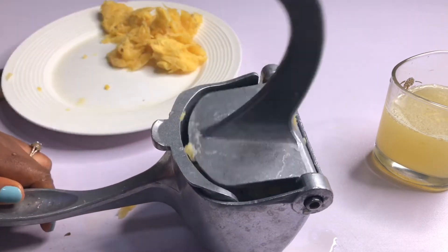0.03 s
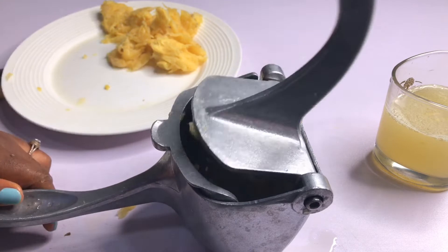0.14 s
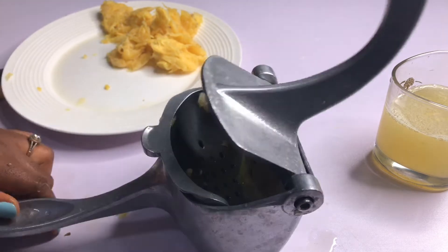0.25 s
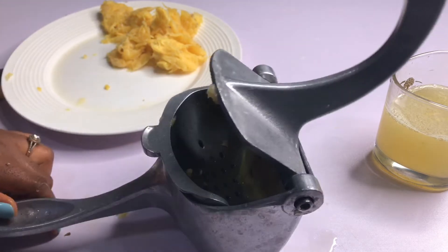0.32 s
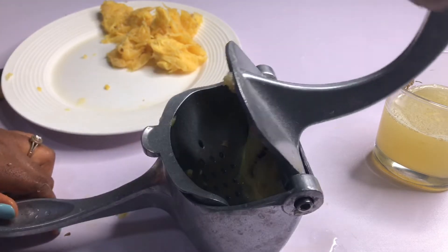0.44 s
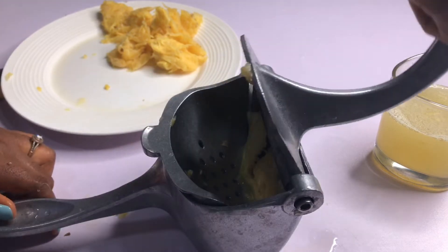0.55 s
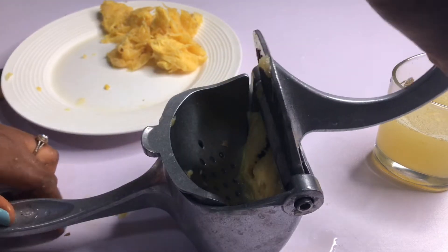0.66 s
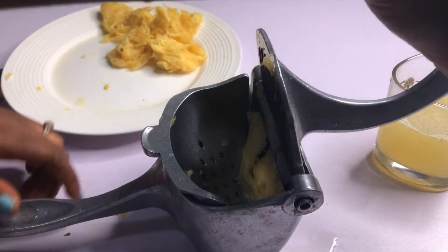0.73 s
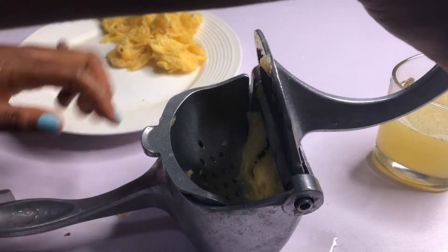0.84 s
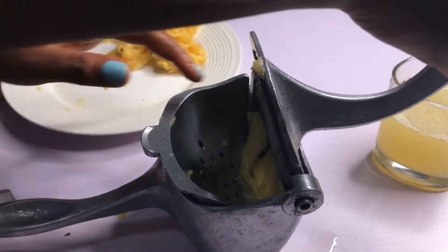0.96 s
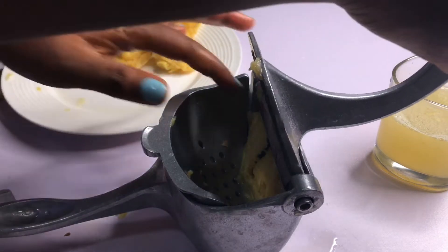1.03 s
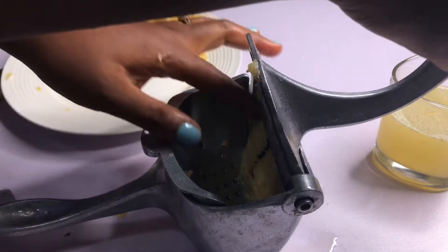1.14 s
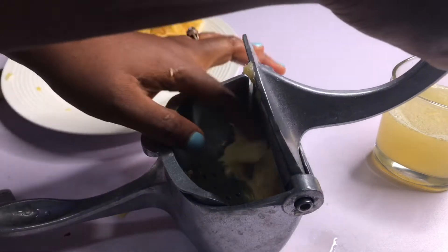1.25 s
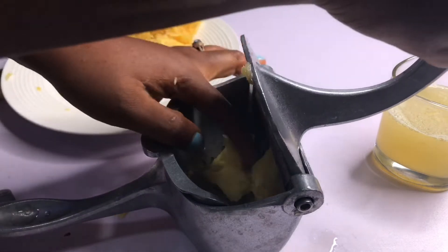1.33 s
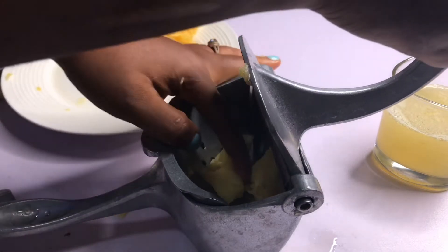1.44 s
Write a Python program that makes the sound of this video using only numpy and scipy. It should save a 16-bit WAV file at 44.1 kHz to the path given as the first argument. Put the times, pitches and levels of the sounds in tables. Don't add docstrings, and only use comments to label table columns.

```python
import sys
import numpy as np
from scipy import signal
from scipy.fft import rfft, irfft
from scipy.io import wavfile
from scipy.ndimage import uniform_filter1d

SR = 44100
rng = np.random.default_rng(int(sys.argv[2]) if len(sys.argv) > 2 else 0)


def voltage_ratio(level):
    return 10 ** (np.asarray(level, float) / 20)


def to_wav(s):
    ch = np.atleast_2d(s).T
    pcm = np.round(np.clip(ch, -1, 1) * 32767)
    wavfile.write(sys.argv[1], SR, pcm.astype(np.int16))


N = 66150
T = np.arange(N) / SR

# start_s, level_db, brightness_hz
LID_BOUNCES = [
    (.2370, 1.5, 6000),
    (0.239, 2.5, 4840),
    (0.2417, -3.5, 5125),
    (.2443, 0.5, 1850),
    (0.2499, -2, 2210),
    (0.2542, -17.5, 1760),
    (0.2631, -12, 1840),
]
# pitch_hz, level_db, t60_s
CASTING_MODES = [(632.4, -2, .12), (841.8, -7.5, 0.28), (947.5, -6, 0.15), (1026, -12, .12),
                 (1308, -14, 0.081), (1444, -11, 0.048), (1490, -12, 0.045), (1620, -15, 0.091),
                 (1856, -1, 0.1), (1970, -8.5, .04), (2600, -7.5, 0.035), (2970, -12, 0.078),
                 (3490, -11, .07), (4140, -4.5, .012)]
# pitch_hz, level_db, t60_s
LID_MODES = [(5360, -12, .07), (6750, -24, .07), (6740, -38, .45), (6795, -44, .4), (5340, -52, .35)]
# pitch_hz, level_db, t60_s
EDGE_MODES = [(2050, -12, .012), (3950, -8, .016), (2600, -14, .012), (8500, -22, .01), (14000, -22, .007)]
# pitch_hz, level_db, t60_s
TABLE_MODES = [(92.6, -2.5, .19), (183.9, 0, 0.2), (233.7, -5.5, 0.27), (293.8, 0.5, 0.22),
               (412.2, -3, 0.1), (320.3, -8, 0.13)]
# freq_hz, level_db
RATTLE_SPECTRUM = [(150, -24.5), (500, -6), (1800, 2.5), (3500, -4.5), (6000, -11.5), (10000, -21),
                   (16000, -30.5)]
# start_s, level_db, centre_hz, contact_s, spread_oct
KNOCKS = [(0.2128, -48, 4170, 0.0044, 0.75), (.2185, -50, 5300, 0.0036, .5),
          (.2245, -45.5, 1800, 0.0037, 1.5), (.229, -41.5, 2970, 0.0071, 0.42),
          (0.6077, -50, 1800, .003, .8), (0.6121, -42, 1153, 0.0027, 0.79),
          (0.613, -38.5, 1310, 0.0034, 0.8), (0.6141, -45.5, 4480, 0.0019, 0.36),
          (0.6182, -46, 2175, 0.0041, 0.89), (.6740, -51.5, 2300, .004, 1.09),
          (.678, -51.5, 1200, .004, .7), (0.901, -51, 1320, 0.0031, .5), (.903, -51.5, 618, 0.0052, .5),
          (1.052, -52, 1350, .006, 0.65), (1.0700, -26.5, 2192, 0.0016, 1.08),
          (1.0735, -32.5, 893, 0.0067, 1.15), (1.082, -38.5, 6000, 0.0024, 0.77),
          (1.155, -56, 4000, 0.0033, 0.65), (1.2173, -42.5, 1500, .002, 1.14),
          (1.2214, -42.5, 1440, 0.0027, 0.53), (1.231, -49.5, 900, .004, .6), (1.281, -49, 644, .006, 0.38),
          (1.281, -57.5, 3540, 0.0051, 0.33), (1.309, -48.5, 1095, .003, 1.5),
          (1.3123, -44, 1350, .004, 0.23), (1.3123, -52, 3470, 0.0037, 0.32),
          (1.33, -57, 3410, 0.0031, 0.54), (1.335, -54, 4146, .0015, .25), (1.34, -54, 1350, 0.0056, 0.46)]
# pitch_hz, level_db, t60_s
HELD_MODES = [(318, -6, .05), (619, -2, .035), (850, -8, .025), (1320, -1, .024), (1515, -3, .022),
              (1980, -5, .016), (2500, 0, .014), (3400, -6, .02), (4150, -8, .01), (4500, -6, .014),
              (5050, -10, .012), (6060, -10, .022), (8020, -13, .01), (9470, -16, .008)]
# start_s, level_db, pitch_hz, t60_s
BUMPS = [(0.06, -32.5, 129, 0.037), (0.13, -44, 101, 0.2), (0.162, -45, 90, 0.34), (0.215, -34, 182, 0.045),
         (0.621, -40.5, 98.7, 0.15), (.625, -45.5, 177, 0.16), (0.844, -43.5, 111, .12),
         (1.074, -41, 175.4, 0.27), (1.074, -36, 325, 0.11), (1.073, -38.5, 113, 0.12),
         (1.148, -50.5, 314, 0.15), (1.249, -46.5, 85, 0.11), (1.253, -42.5, 287, 0.12),
         (1.339, -45, 318.6, .1)]
# start_s, level_db, centre_hz
TICKS = [(0.2158, -54.5, 13050), (1.1743, -47, 14700), (1.178, -44.5, 13300), (1.2030, -65, 12500),
         (1.2298, -50, 12400), (1.2824, -49, 14560), (1.308, -52, 11000), (1.3107, -54, 10100),
         (1.3170, -55, 13200), (1.3314, -49, 13960), (1.4059, -47.5, 13500), (1.4096, -54, 4000),
         (1.4158, -57, 4000), (1.4330, -58.5, 4184), (1.4460, -53, 14050), (1.4670, -61, 13900)]
# start_s, length_s, pitch_hz, fall_hz, level_db
SQUEAKS = [
    (.092, .048, 13900, 300, -72),
    (.197, .016, 2480, 0, -64),
    (1.288, .02, 14300, 700, -73),
    (1.277, .012, 6100, 0, -67),
    (1.277, .01, 9000, 0, -74),
]
# time_s, level_db
RUB_PRESSURE = [(0, -60), (.05, -61), (.08, -69), (.2, -63.5), (.235, -53), (.3, -80), (.6, -58),
                (.74, -69.5), (1.04, -78), (1.1, -55), (1.2, -60.5), (1.3, -60.5), (1.345, -60),
                (1.37, -88), (1.5, -80)]
# freq_hz, level_db
RUB_SPECTRUM = [(200, -11), (600, 4.5), (1300, 2.5), (2500, -12), (4500, -17), (8000, -31.5), (15000, -32)]
# freq_hz, level_db, t60_s
ROOM_BANDS = [(90, -9, 1), (250, 1, 0.41), (706, 4.5, 0.41), (1500, -4.5, 0.52), (2783, -1.5, 0.47),
              (6000, -6, .36), (11000, -3.5, .3), (16400, 7.5, 0.18)]
# freq_hz, level_db_per_hz
AIR_SPECTRUM = [(30, -2), (60, -1), (150, -4.5), (260, -5.5), (560, -24), (1600, -31), (9000, -38.5),
                (15000, -41.5)]
# pitch_hz, rms_db
FRIDGE_LINES = [(237, -61), (108, -72), (328, -74)]

CASTING_DB, CRACK_DB, CRACK_S = -16.5, -8.5, 0.0015
TABLE_DB, TABLE_PUSH_S = -13, 0.0046
RATTLE_DB, RATTLE_S, RATTLE_GRAIN_DB = -12, 0.028, 2.5
KNOCK_RISE_CONTACTS, KNOCK_SCRATCH_DB, KNOCK_DETUNE_RATIO = 0.3, -6.5, 0.015
TICK_S, TICK_WIDTH_RATIO = 0.00023, 0.3
SQUEAK_WOBBLE_HZ = 152
RUB_GRAIN_DB = 2.5
ROOM_DB, ROOM_BUILD_S, LATE_DB, LATE_STRETCH = -8.5, 0.0025, -16.5, 1.6
RINGS_WET_DB, KNOCK_WET_DB, FINE_WET_GAIN = -7, -7, 0.27
AIR_DB, RUMBLE_WANDER_DB = -56.5, 1.5
HUM_WANDER_DB, HUM_WANDER_HZ = 1.2, 0.8
MIC_LOW_HZ, MIC_TOP_HZ = 72, 15900


def colour(x, points):
    points_hz, points_db = np.array(points).T
    hz = np.arange(len(x) // 2 + 1) * SR / len(x) + 1
    gain_db = np.interp(np.log(hz), np.log(points_hz), points_db)
    return irfft(rfft(x) * voltage_ratio(gain_db), len(x))


def level(x, db):
    return x * voltage_ratio(db) / np.sqrt(np.mean(x ** 2))


def walk(rate_hz):
    k = int(SR / rate_hz)
    steps = np.repeat(rng.standard_normal(N // k + 1), k)
    return 1.6 * uniform_filter1d(uniform_filter1d(steps, k), k)[:N]


def since(start_s):
    return np.maximum(T - start_s, 0), T >= start_s


def ring(start_s, modes, gains_db=None, shorten=0.97):
    t, on = since(start_s)
    if gains_db is None:
        gains_db = np.zeros(len(modes))
    out = 0
    for (hz, db, t60_s), gain_db in zip(modes, gains_db):
        out = out + voltage_ratio(db + gain_db) * np.sin(2 * np.pi * hz * t) * voltage_ratio(-60 * t / (t60_s * shorten))
    return on * out


def bandpass(x, edges_hz):
    return signal.sosfilt(signal.butter(2, edges_hz, "bandpass", fs=SR, output="sos"), x)


def burst(start_s, length_s, hz, width_ratio):
    t, on = since(start_s)
    edges_hz = np.clip([hz * (1 - width_ratio), hz * (1 + width_ratio)], 30, 0.45 * SR)
    y = bandpass(rng.standard_normal(N) * on * np.exp(-t / length_s), edges_hz)
    return y / np.max(np.abs(y))


def push(start_s, modes):
    return ring(start_s, modes) * (1 - np.exp(-since(start_s)[0] / TABLE_PUSH_S))


def rattle(start_s):
    t, on = since(start_s)
    grain = rng.standard_normal(N) * voltage_ratio(RATTLE_GRAIN_DB * walk(700))
    return level(colour(grain, RATTLE_SPECTRUM), RATTLE_DB) * on * np.exp(-t / RATTLE_S)


def clack():
    first_s, second_s, third_s = [bounce[0] for bounce in LID_BOUNCES[:3]]
    mode_hz = np.array(CASTING_MODES)[:, 0]
    rings, noises = ring(third_s, LID_MODES), 0
    for start_s, db, bright_hz in LID_BOUNCES:
        dulling_db = -20 * np.log10(1 + (mode_hz / bright_hz) ** 2)
        rings = rings + voltage_ratio(db + CASTING_DB) * ring(start_s, CASTING_MODES, dulling_db)
        noises = noises + voltage_ratio(db + CRACK_DB) * burst(start_s, CRACK_S, 0.5 * bright_hz, 0.72)
    rings = rings + ring(first_s, EDGE_MODES) + ring(second_s, EDGE_MODES)
    rings = rings + voltage_ratio(TABLE_DB) * push(second_s, TABLE_MODES)
    return rings, noises + rattle(first_s)


def knocks():
    taps, scratches = np.zeros(N + SR), 0
    t = T[:SR // 10, None]
    hz, gain_db, t60_s = np.array(HELD_MODES).T
    for start_s, db, centre_hz, contact_s, spread_oct in KNOCKS:
        bend = 1 + KNOCK_DETUNE_RATIO * rng.standard_normal(len(hz))
        near_db = gain_db - 6 * (np.log2(hz / centre_hz) / spread_oct) ** 2
        rise = 1 - np.exp(-t / (KNOCK_RISE_CONTACTS * contact_s))
        modes = voltage_ratio(near_db - 60 * t / t60_s) * np.sin(2 * np.pi * hz * bend * t) * rise
        tap = np.sum(modes, axis=1)
        start = int(start_s * SR)
        taps[start:start + len(tap)] += voltage_ratio(db) * tap / np.max(np.abs(tap))
        scratch = burst(start_s, contact_s, centre_hz, np.clip(0.3 * spread_oct, 0.1, 0.8))
        scratches = scratches + voltage_ratio(db + KNOCK_SCRATCH_DB) * scratch
    return taps[:N], scratches


def bumps():
    return sum(push(start_s, [(hz, db, t60_s)]) for start_s, db, hz, t60_s in BUMPS)


def ticks():
    return sum(voltage_ratio(db) * burst(start_s, TICK_S, hz, TICK_WIDTH_RATIO) for start_s, db, hz in TICKS)


def squeaks():
    out = 0
    for start_s, length_s, hz, fall_hz, db in SQUEAKS:
        progress = np.clip((T - start_s) / length_s, 0, 1)
        pitch_hz = hz - fall_hz * progress + SQUEAK_WOBBLE_HZ * hz / 14000 * walk(180)
        swell = np.sqrt(np.abs(np.sin(np.pi * progress)))
        tone = np.sin(2 * np.pi * np.cumsum(pitch_hz) / SR)
        out = out + voltage_ratio(db + 2.0 * walk(300)) * swell * tone
    return out


def rub():
    grain = rng.standard_normal(N) * voltage_ratio(RUB_GRAIN_DB * walk(220))
    pressure_db = np.interp(T, *np.array(RUB_PRESSURE).T)
    return level(colour(grain, RUB_SPECTRUM), 0) * voltage_ratio(pressure_db)


def room(x):
    t, tail = T[:int(0.7 * SR)], 0
    bands_hz, bands_db, bands_t60_s = np.array(ROOM_BANDS).T
    for hz in 60 * 2 ** np.arange(0, 8.2, 0.5):
        db = np.interp(np.log(hz), np.log(bands_hz), bands_db)
        t60_s = np.interp(np.log(hz), np.log(bands_hz), bands_t60_s)
        band = bandpass(rng.standard_normal(len(t)), [hz / 2 ** 0.25, hz * 2 ** 0.25])
        early = voltage_ratio(db - 60 * t / t60_s)
        late = voltage_ratio(db + LATE_DB - 60 * t / (t60_s * LATE_STRETCH))
        tail = tail + (early + late) * band
    tail = tail * (1 - np.exp(-t / ROOM_BUILD_S))
    tail = tail / np.sqrt(np.sum(tail ** 2))
    return signal.fftconvolve(x, tail)[:N] * voltage_ratio(ROOM_DB)


def fridge():
    out = 0
    for hz, db in FRIDGE_LINES:
        gain = voltage_ratio(db + 3 + HUM_WANDER_DB * walk(12))
        out = out + gain * np.sin(2 * np.pi * np.cumsum(hz + HUM_WANDER_HZ * walk(10)) / SR)
    return out


def room_noise():
    noise = level(colour(rng.standard_normal(N), AIR_SPECTRUM), AIR_DB)
    low = signal.sosfiltfilt(signal.butter(2, 400, fs=SR, output="sos"), noise)
    return noise - low + low * voltage_ratio(RUMBLE_WANDER_DB * walk(20))


def scene():
    rings, noises = clack()
    taps, scratches = knocks()
    fine = ticks() + squeaks()
    noises = noises + rub() + scratches
    wet = room(noises + voltage_ratio(RINGS_WET_DB) * rings + voltage_ratio(KNOCK_WET_DB) * taps + FINE_WET_GAIN * fine)
    return (rings + noises + taps + bumps() + fine + wet + fridge() + room_noise())[None]


def low_pass(x):
    return signal.sosfilt(signal.butter(12, 16490, fs=SR, output="sos"), x)


def record(dry):
    x = np.tanh(dry)
    x = signal.sosfilt(signal.butter(3, MIC_LOW_HZ, "highpass", fs=SR, output="sos"), x)
    x = signal.sosfilt(signal.ellip(8, 0.2, 60, MIC_TOP_HZ, fs=SR, output="sos"), x)
    return low_pass(x)


dry = scene()
out = record(dry)
to_wav(out)
```